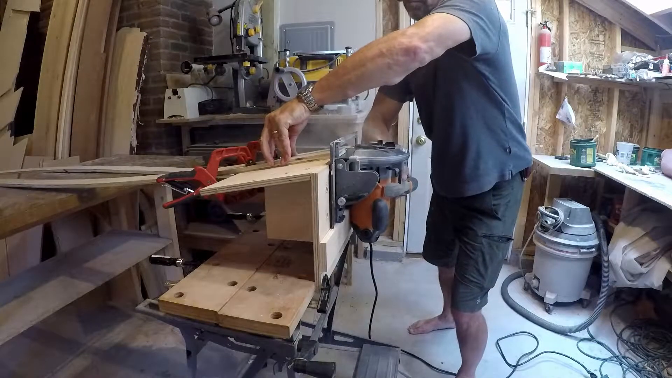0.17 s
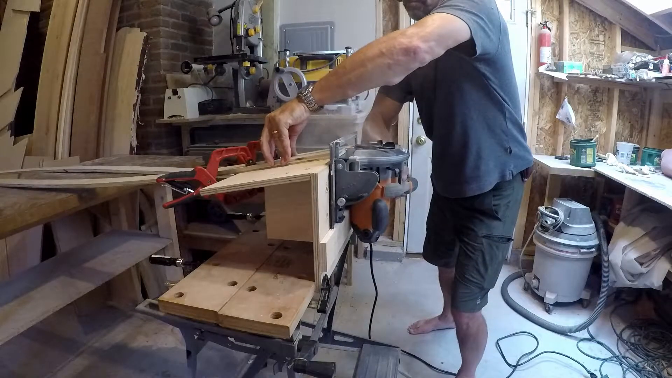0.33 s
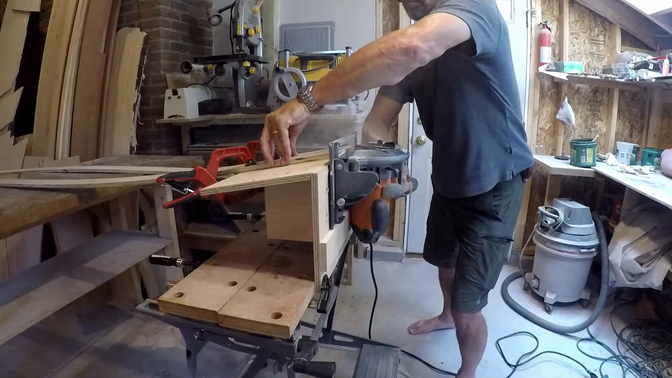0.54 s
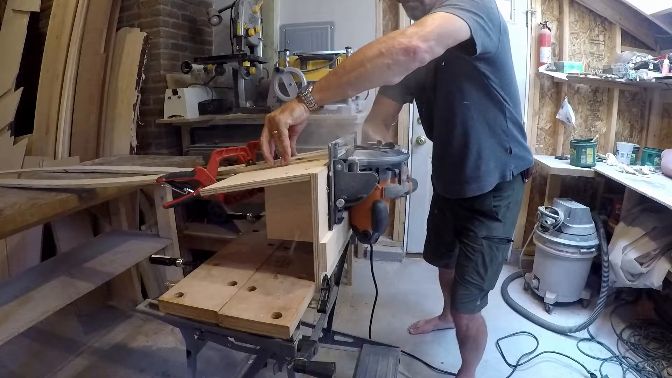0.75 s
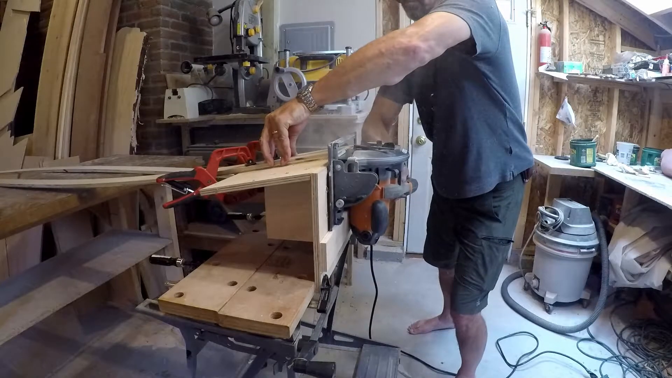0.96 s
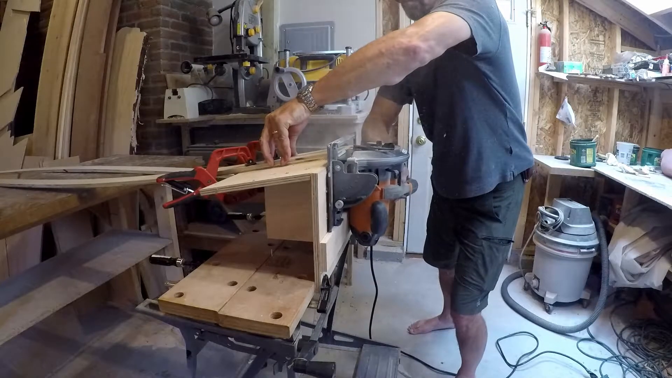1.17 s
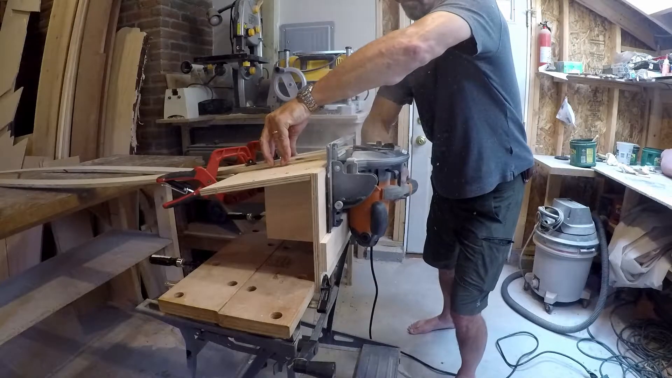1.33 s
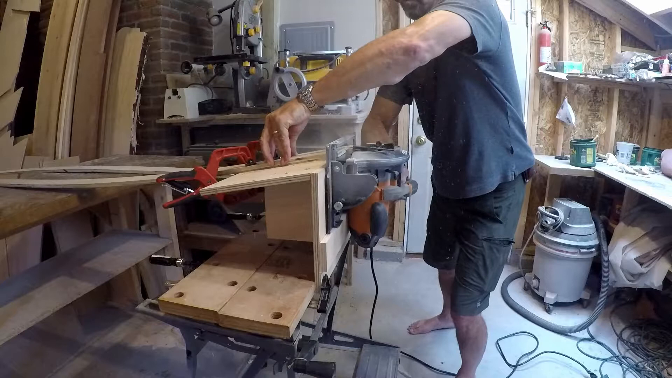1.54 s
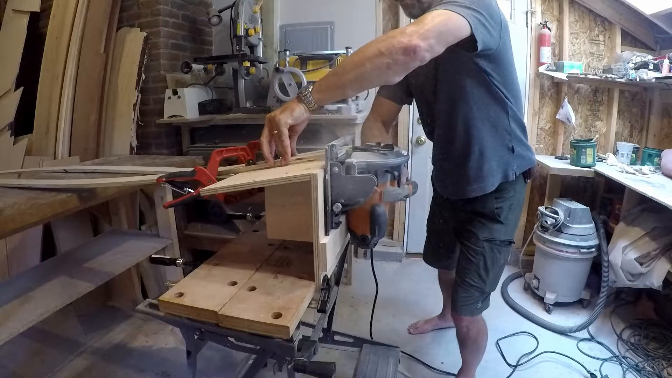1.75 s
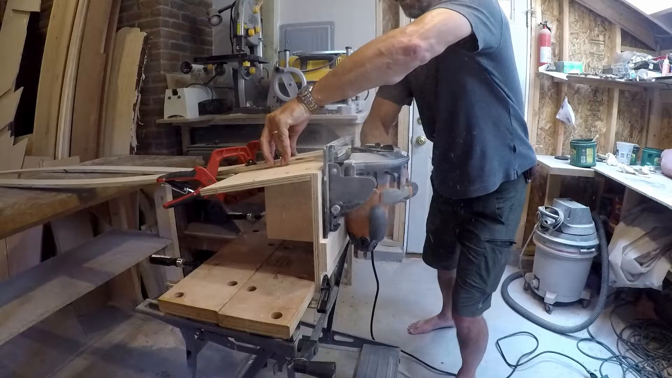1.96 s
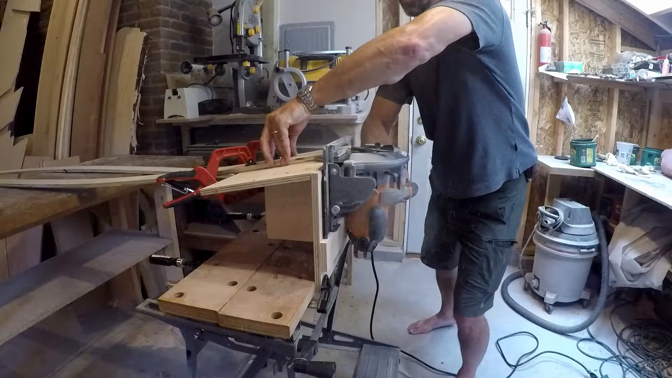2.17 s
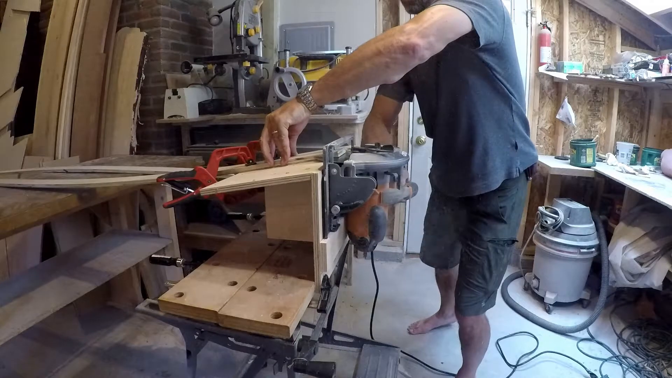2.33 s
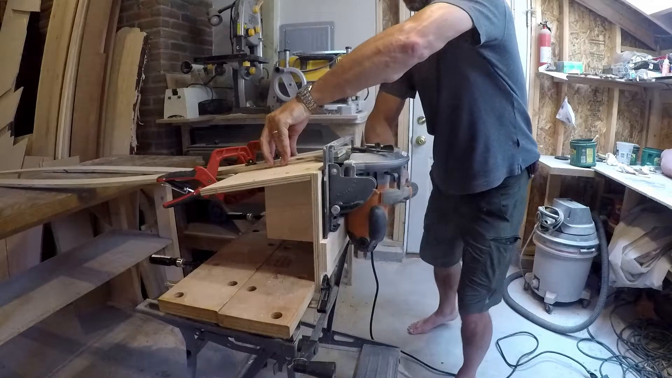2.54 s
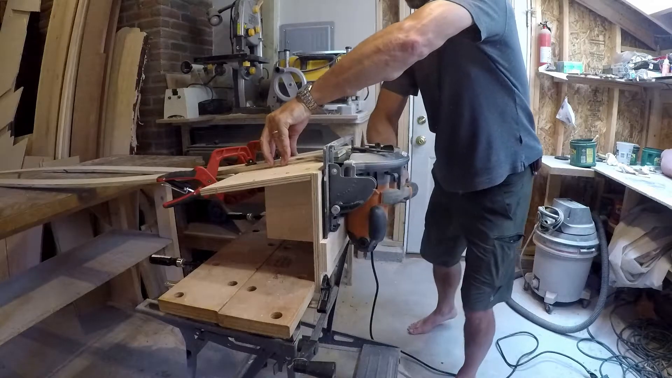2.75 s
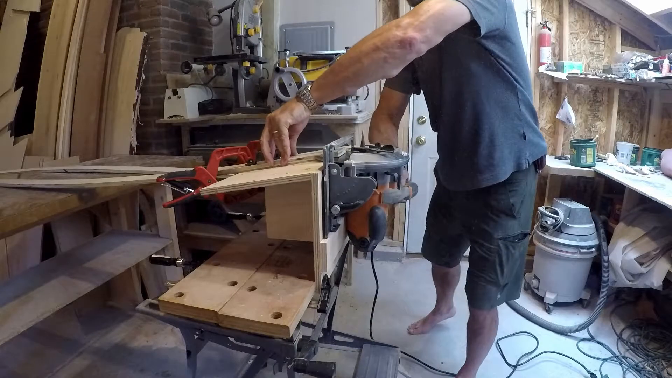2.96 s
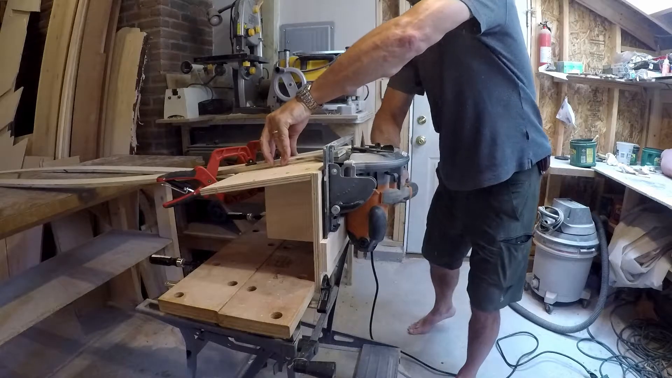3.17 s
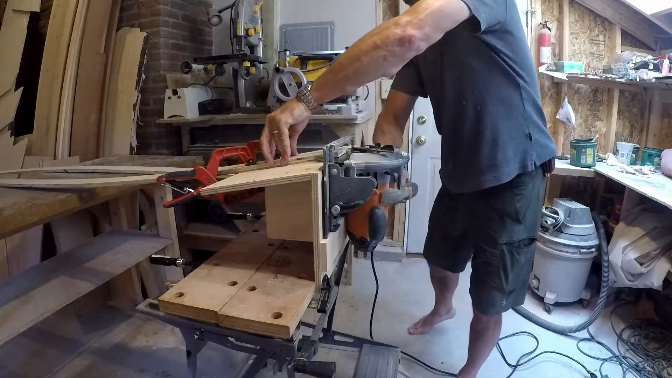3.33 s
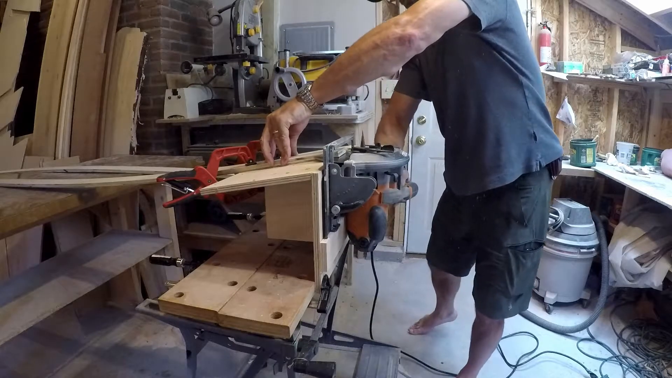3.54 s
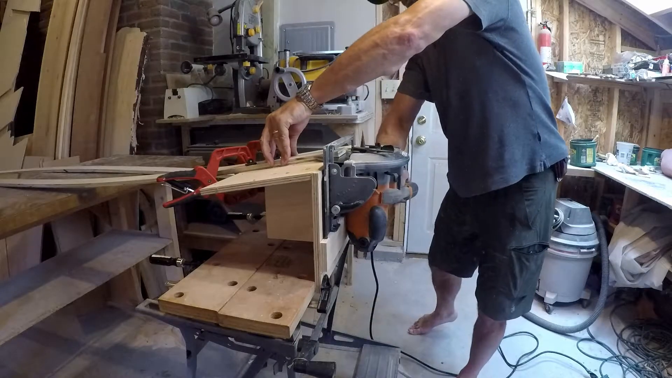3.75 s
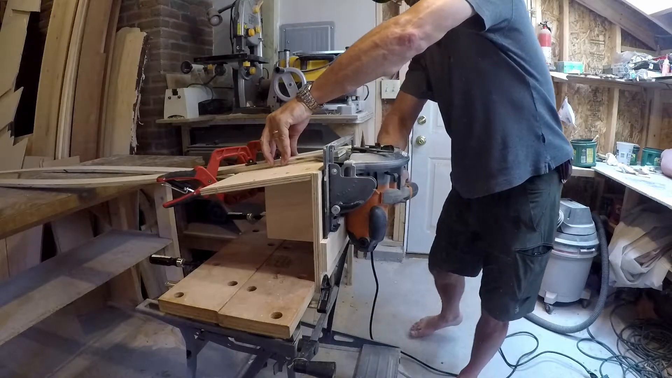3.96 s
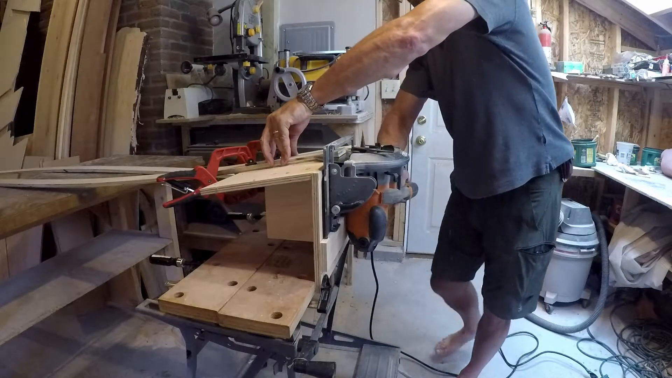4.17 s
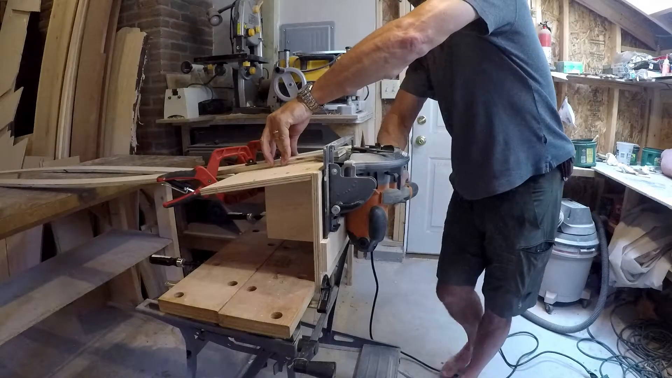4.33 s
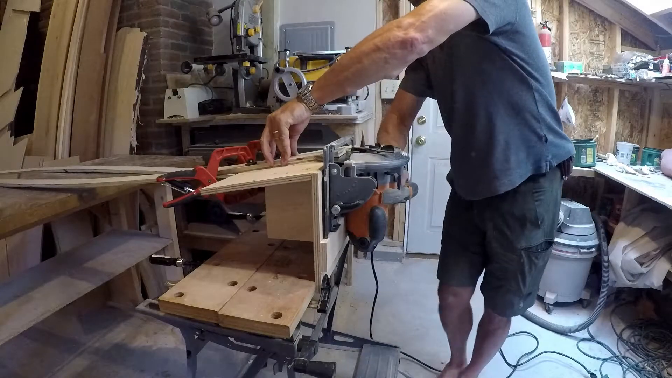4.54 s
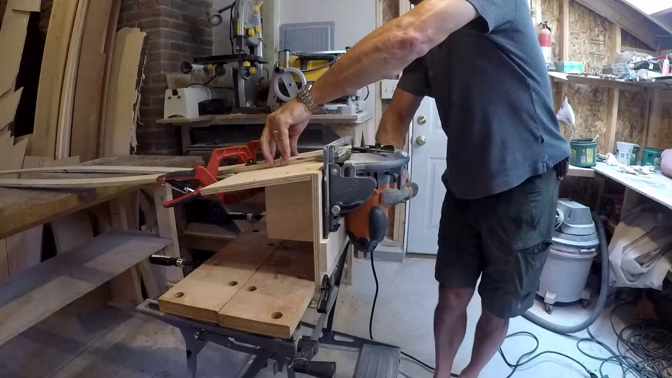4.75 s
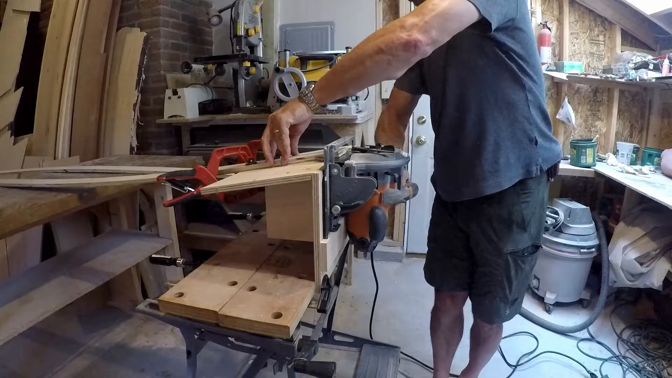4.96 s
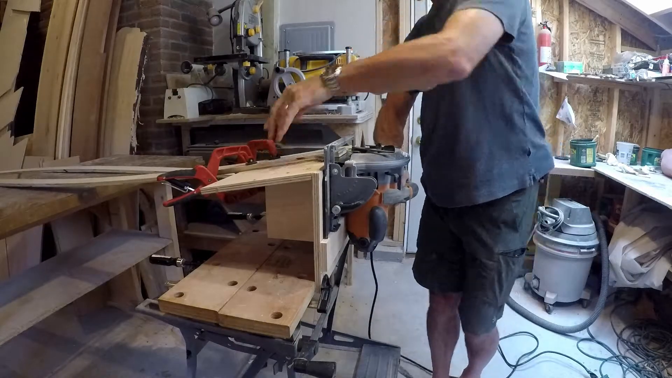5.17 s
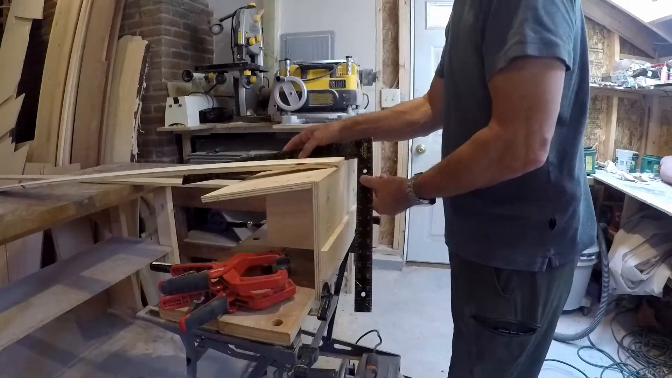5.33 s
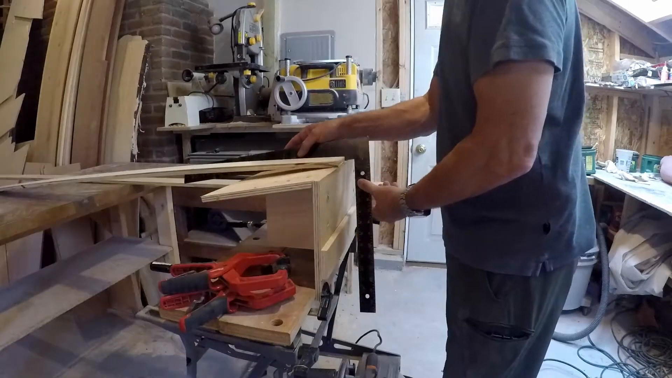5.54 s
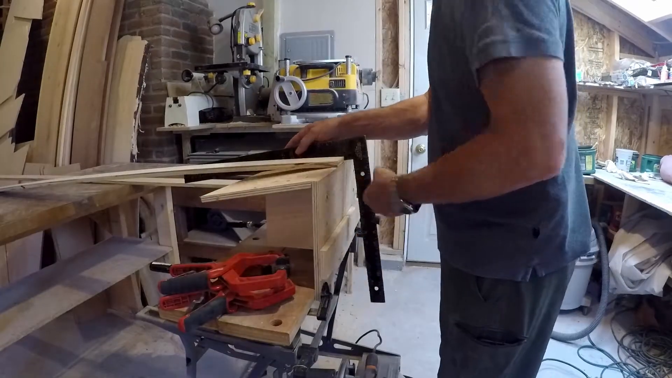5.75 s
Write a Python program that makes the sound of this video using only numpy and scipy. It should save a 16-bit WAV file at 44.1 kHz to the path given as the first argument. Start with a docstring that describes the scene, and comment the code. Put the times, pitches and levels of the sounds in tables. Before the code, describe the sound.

In a small workshop, a nearby handheld circular saw cuts a thin strip off a board. Its blade squeals and whines at first over a harsh, hissing rasp, then rings on steadily while the loose strip rattles in falling tones. The saw is switched off and quickly dies away. A brief low hum, quiet room noise, a few soft thuds and one small metal click follow.

```python
"""In a small workshop, a handheld circular saw cuts a thin strip off a board.
The teeth rasp through the wood, shake the board and ring the steel blade, which squeals when pinched.
The strip rattles, and its tones sink as more of it is cut free. In brief dropouts the sound thins to
a few ringing pitches. The saw is switched off and dies away, leaving a low hum, quiet room noise,
soft thuds and the click of a small metal part."""
import sys
import numpy as np
from scipy import signal
from scipy.fft import rfft, irfft, next_fast_len
from scipy.io import wavfile
from scipy.ndimage import uniform_filter1d, map_coordinates

SR = 44100
rng = np.random.default_rng(int(sys.argv[2]) if len(sys.argv) > 2 else 0)


def digitize_waveform(pressure):
    """Quantize a signal to 16-bit integers and store it at the path in sys.argv[1].

    Rows of a 2-D input are taken as channels; values are limited to [-1, 1].
    """
    field = np.atleast_2d(pressure).T
    bounded = np.clip(field, -1, 1)
    quanta = np.round(bounded * 32767).astype(np.int16)
    wavfile.write(sys.argv[1], SR, quanta)


N = 260190

# the blade starts to sink in, is deep in the board, starts to come out, is switched off
SINK_S, DEEP_S, EXIT_S, OFF_S = 1.5, 2.47, 4.11, 4.703
FEED_S = 1.58  # the saw starts to move along faster
# the board's modes (the pitches it rings at by itself): f/Hz, width/Hz, level/dB
BOARD_MODES = [(172.2, 22.4, -0.5), (241, 16, -0.5), (338.4, 19.3, 4), (394, 27, -1.5), (458, 29.6, 4),
               (528, 36, 3.5), (932, 250, -4.5)]


def saw(dropout_share=0.1):
    """The teeth tear the wood and set the board, the blade and the loose strip ringing."""
    force = bite()
    wood = amp(-dropout_share * dropouts()) * (workshop(rasp(force), wet_db=-9.5) + board(force))
    disc = strip_damping() * (blade(force) + main_note()) + flares() + squeals()
    sound = thinned(wood + disc + whine() + strip() + growl())
    # so small a board gives off almost no bass below 142 Hz
    return filtered(sound, lambda hz: 1 / np.sqrt(1 + (142 / (hz + 1)) ** 18))


def bite(feed_db=1.01, chatter_db=0.71):
    """How hard the teeth bite: an uneven push plus fast chatter."""
    return amp(feed_db * wobble(24.174) + chatter_db * wobble(260))


def rundown(power):
    """Loudness follows a power of the blade's speed, which falls evenly after switching off."""
    speed = 1 - ramp(OFF_S, OFF_S + 0.31)
    return speed ** power


def cutting(fade_db_per_s=10):
    """The strength of the cutting, which eases as the blade leaves the wood."""
    return amp(-fade_db_per_s * since(EXIT_S)) * rundown(power=2.9)


def rasp(force, early_db=-22.7, late_db=-25.3, chips_db=-44, chips_swing_db=3.5):
    """Tearing fibres make a noise that changes as the blade sinks in; flying chips add a fizz."""
    # tone colour of the tearing, early and late in the cut: f/Hz, level/dB
    early_colour = [(350, -20), (650, -9), (950, -3), (1500, -0.5), (2200, 0), (2600, -4), (3100, -0.5),
                    (4000, -1), (5000, -6.5), (6000, -1), (7200, 0.5), (8200, -5.5), (10000, -10.5),
                    (11500, -21), (15000, -22)]
    late_colour = [(350, -48), (650, -23), (960, -18.5), (1100, -5.5), (1240, -9.5), (1600, -14),
                   (2860, -16), (3100, -15), (3320, -14.5), (4770, -19), (5700, -17.5), (6250, -13.5),
                   (7450, -11), (10000, -18.5), (11500, -31), (15000, -35)]
    teeth = lambda: steel(force * rng.standard_normal(N))
    depth = ramp(SINK_S, DEEP_S)
    fibres = amp(early_db) * np.sqrt(1 - depth) * coloured(teeth(), early_colour)
    fibres += amp(late_db) * np.sqrt(depth) * coloured(teeth(), late_colour)
    chips = amp(chips_db + chips_swing_db * wobble(34))
    chips *= held(SINK_S, EXIT_S - SINK_S, attack_s=0.46, release_s=0.31)
    fizz = coloured(teeth(), [(8000, -51.5), (11000, -5), (15000, -5)])
    return cutting() * (fibres + chips * fizz)


def steel(x, spacing_hz=16, depth_db=3.5):
    """The blade's crowded high modes cut fine, random peaks into the treble."""
    def response(hz):
        grid_hz = np.arange(0, SR / 2, spacing_hz)
        peaks = np.interp(hz, grid_hz, rng.standard_normal(SR // 10)[:len(grid_hz)])
        return amp(depth_db * peaks * np.clip(hz / 2500, 0, 1))
    return filtered(x, response)


def blade(force, pinch_s=0.43, loosen_db_per_s=14, deep_db=-23.5, shallow_db=-13):
    """The steel disc rings one way when pinched, another deep in the cut, a third running free."""
    # the disc's modes in each state: f/Hz, width/Hz, level/dB
    pinched_modes = [(1569, 13, -5.5), (2180, 12, -10.5), (2436, 6, -1.5), (2650, 6.4, -3),
                     (2792, 4.6, -0.5), (3100, 16, -6), (3644, 14, -5), (4320, 5.2, -10), (4647, 5.3, -3),
                     (6342, 15, 0), (6650, 26, 3), (7560, 60, -10), (7920, 14, 0.5), (7970, 10, -6),
                     (9250, 31, -8)]
    deep_modes = [(1426, 55, -11), (2048, 38, -4.5), (2728, 37, -8), (3064, 38, 1.5), (3193, 47, -6),
                  (3555, 38, -0.5), (4160, 22, -9.5), (5410, 26, -4.5), (5944, 65, -2.5), (6196, 60, -5.5),
                  (6477, 75, 0.5), (7144, 50, -1.5), (7330, 64, -1), (7536, 31, 0.5), (7740, 20, -3),
                  (8280, 30, -3.5)]
    free_modes = [(343, 14.5, 2), (1442, 22, 5), (1967, 15, 5), (2705, 16, 3), (3030, 34, -1),
                  (3530, 30, 1.5), (3860, 26, -5), (4190, 14, 1), (4350, 14, -1), (5250, 30, -2),
                  (6300, 55, 1.5), (6480, 45, 2.5), (7380, 81, -4)]
    pinched = amp(-21.5 - loosen_db_per_s * np.abs(clock() - pinch_s))
    deep = amp(deep_db + shallow_db * (1 - ramp(pinch_s, SINK_S))) * cutting()
    free = amp(-31.5) * ramp(EXIT_S - 0.17, EXIT_S) * rundown(power=1.66)
    return (pinched * ring(force, pinched_modes)
            + deep * ring(force, deep_modes)
            + free * ring(force, free_modes))


def ring(force, modes, shimmer_db=1.4):
    """The teeth drive each mode of the disc unevenly, so each swells and fades on its own."""
    out = np.zeros(N)
    for hz, width, db in modes:
        drive = force * rng.standard_normal(N) * amp(db + shimmer_db * wobble(11))
        out += signal.lfilter(*signal.iirpeak(hz, hz / width, SR), drive)
    return unit(out)


def main_note(start_hz=1121, settled_hz=1100, chatter_db=1.5):
    """The blade's main note chatters, sags as the cut deepens and at times flares into a firmer tone."""
    # flare-ups of the note: start/s, length/s, level/dB
    flare_ups = [(0.33, 0.15, -22.5), (0.66, 0.16, -24.5), (0.93, 0.19, -21), (1.2, 0.13, -23.5),
                 (1.445, 0.016, -24.5), (1.681, 0.13, -21), (2.683, 0.053, -25), (2.905, 0.047, -16.5),
                 (3.035, 0.033, -26.5), (3.451, 0.14, -28), (3.77, 0.1, -21), (3.9, 0.047, -29),
                 (4.15, 0.041, -26), (4.29, 0.053, -26)]
    hz = start_hz + (settled_hz - start_hz) * ramp(0.4005, 1.2)
    ringing = amp(-32) * rundown(power=1.43) * tone(hz, width_hz=43.5, rough=0.91)
    flaring = amp(-3.5) * bouts(flare_ups, attack_s=0.025, release_s=0.047)
    singing = flaring * tone(hz, width_hz=22, rough=0.23)
    return amp(chatter_db * wobble(130)) * (ringing + singing)


def flares(width_hz=30, rough=0.32):
    """Other modes of the disc sing out alone for a moment."""
    # each flare: start/s, length/s, level/dB, f/Hz
    notes = [(2.06, .08, -30, 3370), (2.265, 0.066, -29, 3090), (2.49, 0.037, -33.5, 1330),
             (3.025, .05, -30, 3110), (3.433, 0.041, -29, 3095), (3.413, 0.15, -37, 2750),
             (3.579, 0.028, -32, 3530), (4.304, 0.034, -38, 3100), (4.421, 0.042, -31.5, 3055)]
    return sum(amp(db) * held(start, length, attack_s=0.022, release_s=0.027) * tone(hz, width_hz, rough)
               for start, length, db, hz in notes)


def squeals(width_hz=17, rough=0.12):
    """The sides of the cut pinch the blade, and it squeals in nearly pure, drifting tones."""
    # each squeal: start/s, length/s, level/dB, f/Hz, glide/(Hz per s)
    pinches = [(0.0025, 0.032, -27.5, 1335, -120), (0.234, 0.31, -26, 1309, -4),
               (.72, 0.17, -32, 1328, 214), (0.567, 0.49, -29.5, 1239, -21)]
    out = np.zeros(N)
    for start, length, db, hz, glide in pinches:
        level = amp(db) * held(start, length, attack_s=0.11, release_s=0.16)
        out += level * tone(hz + glide * since(start), width_hz, rough)
    return out


def whine(start_s=0.85, length_s=0.5, start_hz=2738, climb_hz=240, damping=0.018, flutter=0.0109):
    """A hoarse, ragged whine swells and climbs as the blade is squeezed, then levels off."""
    # the tones in the whine: pitch ratio, level/dB
    partials = [(0.999, 0), (1.06, 3), (2, -2), (2.92, -0.5), (3.9, -10), (4.45, -10.5), (4.83, -12.5)]
    rise = ramp(start_s, start_s + length_s)
    hz = (start_hz + climb_hz * rise) * (1 + flutter * wobble(120))
    level = amp(-37 + 3 * rise) * held(start_s, length_s, attack_s=0.071, release_s=0.17)
    return level * sum(amp(db) * tone(ratio * hz, damping * ratio * start_hz, rough=0.7)
                       for ratio, db in partials)


def strip(damping=0.04, rough=0.72, rattle_db=-0.6):
    """The loose strip's bending tones sink together; each swells at pitches that carry well."""
    # spells of rattling: start/s, length/s, level/dB
    rattles = [(1.58, .04, -32), (1.66, 0.1, -30.5), (1.8, 0.06, -27.5), (1.88, 0.13, -29),
               (2.1, 0.76, -41), (2.46, .08, -35.5), (2.85, 0.25, -36), (3.15, 0.27, -40),
               (3.48, 0.11, -38)]
    # the strip's bending modes: pitch ratio, level/dB
    bending_modes = [(1, 2.5), (1.66, 0.5), (2.06, -2), (2.88, 0.5), (3.779, 0.5), (4.7, 1)]
    # how well the board and saw pass each pitch to the air: f/Hz, level/dB
    carrying = [(130, -21), (180, -13), (300, -17), (340, 2), (400, 2.5), (800, -11.5), (1050, -1.5),
                (1400, 0.5), (1600, -1), (2150, 1), (2600, -3), (3100, -10), (5000, -7.5), (7600, 4.5),
                (10000, -13.5), (15000, -28)]
    pitch = strip_pitch(flutter=0.02)
    level = bouts(rattles, attack_s=0.094, release_s=0.13) * amp(rattle_db * wobble(90))
    out = np.zeros(N)
    for ratio, db in bending_modes:
        hz = ratio * pitch
        width_hz = damping * np.median(hz[level > 0])
        out += amp(db + along(carrying, hz)) * tone(hz, width_hz, rough)
    return workshop(level * out, wet_db=-17.5)


def strip_pitch(flutter, hz_at_feed=2842, slow_growth=0.33, fast_growth=1.155):
    """The longer the free strip, the lower its tone; flapping against the blade blurs the pitch."""
    relative_length = 1 + slow_growth * np.minimum(clock() - FEED_S, 0) + fast_growth * since(FEED_S)
    return hz_at_feed / relative_length * (1 + flutter * wobble(170))


def strip_damping(length_s=0.49, loss_db=4):
    """The freshly loosened strip leans on the blade and quiets its ring."""
    return amp(-loss_db * held(FEED_S, length_s, attack_s=0.042, release_s=0.15))


def growl(ratio=0.117, rattle_db=1.5, board_db=-15):
    """The strip's lowest mode shudders in short bursts and shakes a low mode of the board."""
    # each burst: start/s, length/s, level/dB
    shudders = [(1.12, 0.18, -38), (1.17, 0.017, -31), (1.44, 0.094, -27), (1.66, 0.45, -48),
                (2.28, 0.27, -47.5)]
    level = bouts(shudders, attack_s=0.051, release_s=0.051) * amp(rattle_db * wobble(110))
    board_hz, board_width_hz, _ = BOARD_MODES[1]
    shaken = amp(board_db) * tone(board_hz, board_width_hz, rough=0.7)
    return level * (tone(ratio * strip_pitch(flutter=0.012), width_hz=20, rough=0.1) + shaken)


def board(force, early_db=-34.5, deep_db=-38.5, exit_db=4, decay_db_per_s=62):
    """The board rumbles less with the blade deep in it, and more again at the far end."""
    db = early_db + (deep_db - early_db) * ramp(SINK_S, DEEP_S) + exit_db * ramp(EXIT_S, OFF_S)
    level = amp(db - decay_db_per_s * since(OFF_S))
    return level * resonate(force * rng.standard_normal(N), BOARD_MODES)


def dropouts(half_length_s=0.014):
    """The depth in dB of brief dropouts in which the sound thins to a few ringing pitches."""
    # the middle of each dropout: t/s, depth/dB
    moments = [(.355, 9), (.438, 8), (.548, 8), (.921, 22), (1.058, 9), (1.185, 10), (1.4, 7), (1.465, 9),
               (1.53, 10), (1.912, 12), (1.98, 11), (2.038, 10), (2.488, 8), (2.53, 8), (2.873, 11),
               (3.085, 9), (3.512, 11), (3.596, 10), (3.685, 8), (4.567, 22)]
    return sum(db * np.exp(-((clock() - s) / half_length_s) ** 4) for s, db in moments)


def thinned(x, threshold=1.255):
    """During each dropout, only pitches that stand out from their neighbours keep their strength."""
    spectrum = signal.stft(x, nperseg=512)[2]
    neighbours = uniform_filter1d(np.abs(spectrum), size=61, axis=0)
    stands_out = np.abs(spectrum) > threshold * neighbours
    ringing = signal.istft(spectrum * stands_out, nperseg=512)[1][:N]
    return ringing + amp(-dropouts()) * (x - ringing)


def click(ring_db=-18, ring_t60=0.38):
    """A small metal part rubs, snaps against its stop and settles; each contact rings briefly."""
    # each contact: t/s, level/dB, t60/s (the time it takes to fade by 60 dB)
    contacts = [(5.632, -59, .15), (5.686, -28, .007), (5.802, -57, 0.045)]
    # the part's modes: f/Hz, width/Hz, level/dB
    metal_modes = [(2060, 240, -9), (3070, 200, -1), (3620, 250, -4), (6450, 600, -11), (7250, 170, -3.5),
                   (9500, 250, -14)]
    blows = np.zeros(N)
    for s, db, t60 in contacts:
        age = since(s)
        blows += (age > 0) * amp(db) * (amp(-60 * age / t60) + amp(ring_db - 60 * age / ring_t60))
    ringing = resonate(blows * rng.standard_normal(N), metal_modes)
    strength = np.sqrt(np.mean(blows ** 2))
    return workshop(strength * ringing, wet_db=-12)


def hum(hz=170, hiss_db=-13):
    """A low, slightly unsteady machine hum with a thin hiss."""
    # spells of hum: start/s, length/s, level/dB
    spells = [(4.3, 0.57, -49.5), (4.95, 0.14, -45), (5.16, 0.11, -45)]
    hiss_colour = [(2000, 5), (4500, -6), (7400, -3), (9000, -29), (15000, -36)]  # f/Hz, level/dB
    hiss = amp(hiss_db) * coloured(rng.standard_normal(N), hiss_colour)
    return bouts(spells, attack_s=0.041, release_s=0.034) * (tone(hz, width_hz=16, rough=0.29) + hiss)


def thuds(first_s=5.413, gap_s=0.103, first_db=-40.5, loss_db=1.5, hz=45, width_s=0.0043):
    """Five soft, evenly spaced thuds, each quieter than the last."""
    out = np.zeros(N)
    for k in range(5):
        age = clock() - first_s - k * gap_s
        pulse = np.exp(-0.5 * (age / width_s) ** 2) * np.sin(2 * np.pi * hz * age)
        out += amp(first_db - k * loss_db) * pulse
    return out


def room_noise(air_db=-51, rumble_db=-57):
    """Quiet, steady room noise, joined near the end by a faint rumble."""
    # tone colour of the room's air and of the rumble: f/Hz, level/dB
    air_colour = [(100, -20), (170, -1), (300, -1), (600, -7), (1300, -9.5), (2600, -22), (4500, -25.5),
                  (7200, -20), (9000, -26), (15000, -38)]
    rumble_colour = [(20, -16), (110, -12), (170, -1), (260, -10), (2000, -70)]
    air = amp(air_db) * coloured(rng.standard_normal(N), [(30, -38)] + list(air_colour))
    rumble = amp(rumble_db) * coloured(rng.standard_normal(N), rumble_colour)
    return air + rumble * ramp(5.31, 5.33)


def workshop(x, wet_db):
    """The walls add a short wash of echoes at wet_db; the treble fades first."""
    # how long the echoes take to fade by 60 dB: f/Hz, t60/s
    fade_times = [(200, 0.25), (3000, 0.16), (7000, 0.088), (14000, 0.023)]
    hz, t, noise = signal.stft(rng.standard_normal(SR // 2), SR, nperseg=256)
    fade = amp(-60 * t / along(fade_times, hz)[:, None])
    tail = signal.istft(noise * fade, SR, nperseg=256)[1]
    echoes = signal.fftconvolve(x, tail / np.linalg.norm(tail))[:N]
    return (x + amp(wet_db) * echoes) / np.sqrt(1 + amp(wet_db) ** 2)


def tone(hz, width_hz, rough):
    """A ringing tone that can glide, from steady (rough=0) to randomly shaken (rough=1)."""
    pole = np.exp(-2 * np.pi * width_hz / SR)
    kicks = rng.standard_normal(N) + 1j * rng.standard_normal(N)
    shaken = unit(signal.lfilter([1], [1, -2 * pole, pole ** 2], kicks))
    swing = np.sqrt(1 - rough) + np.sqrt(rough) * shaken
    phase = 2 * np.pi * np.cumsum(hz * np.ones(N)) / SR
    return np.sqrt(2) * np.abs(swing) * np.cos(phase + np.angle(swing))


def resonate(x, modes):
    """Let x ring a set of modes; the result has strength 1."""
    out = np.zeros(N)
    for k, (hz, width, db) in enumerate(modes):
        out += (-1) ** k * amp(db) * signal.lfilter(*signal.iirpeak(hz, hz / width, SR), x)
    return unit(out)


def coloured(x, colour):
    """Give x a tone colour; the result has strength 1."""
    return unit(filtered(x, lambda hz: amp(along(colour, hz))))


def filtered(x, response):
    """Scale each frequency in x by response(hz)."""
    size = next_fast_len(N + SR // 2)
    return irfft(rfft(x, size) * response(np.fft.rfftfreq(size, 1 / SR)), size)[:N]


def along(points, hz):
    """Read between (f/Hz, value) points on a log frequency axis."""
    point_hz, values = np.transpose(points)
    return np.interp(np.log(hz + 1), np.log(point_hz + 1), values)


def wobble(rate):
    """A smooth random curve with rate new values a second."""
    return map_coordinates(rng.standard_normal(int(N * rate / SR) + 4), [clock() * rate], order=2)


def bouts(rows, attack_s, release_s):
    """A loudness curve that follows the loudest of the (start/s, length/s, level/dB) rows."""
    return np.max([amp(db) * held(start, length, attack_s, release_s)
                   for start, length, db in rows], axis=0)


def held(start, length, attack_s, release_s):
    """A loudness curve that reaches 1 at start, holds, then lets go."""
    return ramp(start - attack_s, start) * (1 - ramp(start + length, start + length + release_s))


def ramp(start, end):
    """Rises from 0 to 1 between two moments."""
    return np.clip((clock() - start) / (end - start), 0, 1)


def since(s):
    """Seconds gone by since a moment, 0 before it."""
    return np.maximum(clock() - s, 0)


def clock():
    """The time of every sample in seconds."""
    return np.arange(N) / SR


def amp(db):
    """Turn decibels into a multiplier."""
    return 10 ** (np.asarray(db) / 20)


def unit(x):
    """Scale x to an average strength (rms) of 1."""
    return x / np.sqrt(np.mean(np.abs(x) ** 2) + 1e-20)


def scene():
    """The saw and the room around it, in one channel."""
    return (saw() + hum() + thuds() + room_noise() + click())[None]


def record(dry, top_hz=15300):
    """Cut off the very highest treble."""
    return np.array([filtered(x, lambda hz: hz < top_hz) for x in dry])


dry = scene()
out = record(dry)
digitize_waveform(out)
```